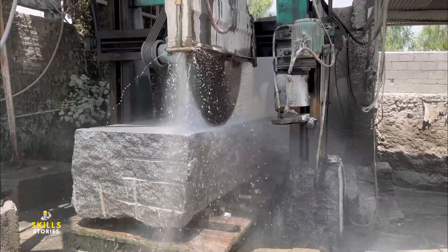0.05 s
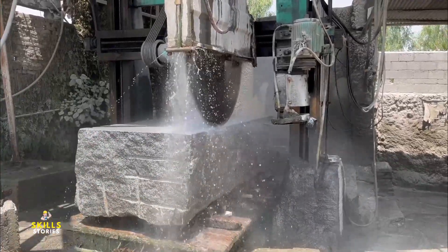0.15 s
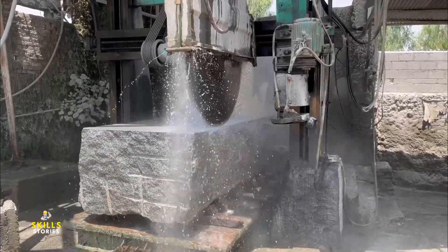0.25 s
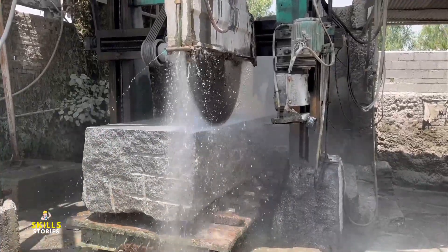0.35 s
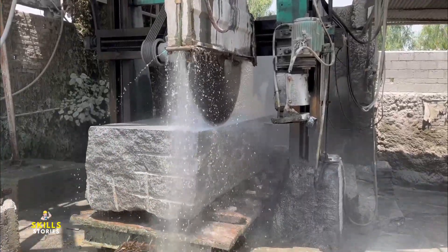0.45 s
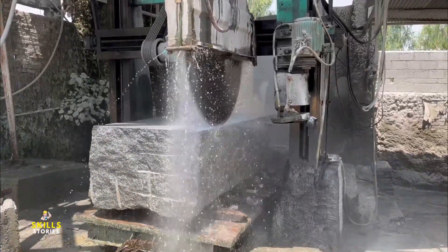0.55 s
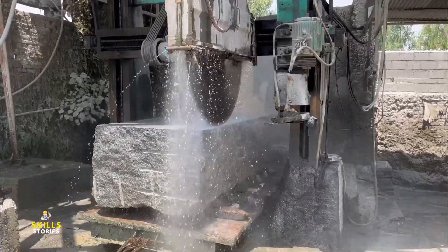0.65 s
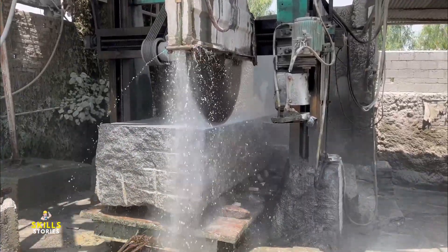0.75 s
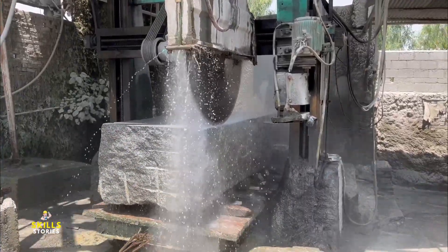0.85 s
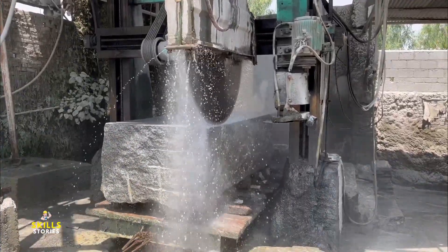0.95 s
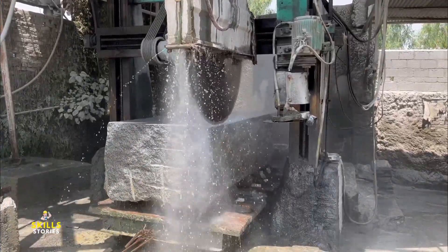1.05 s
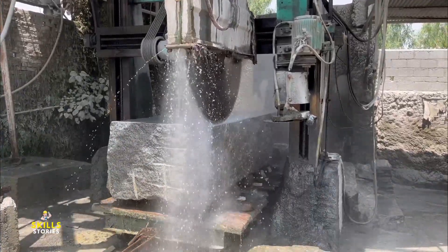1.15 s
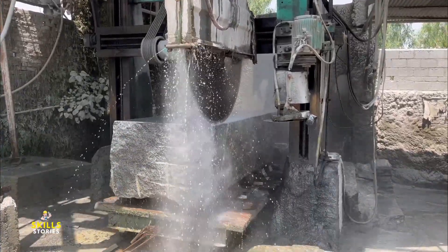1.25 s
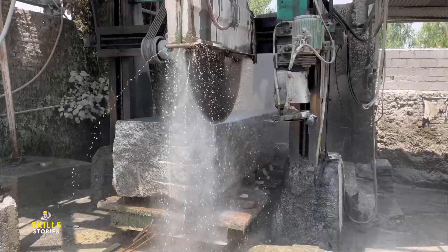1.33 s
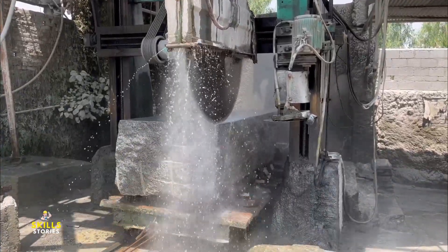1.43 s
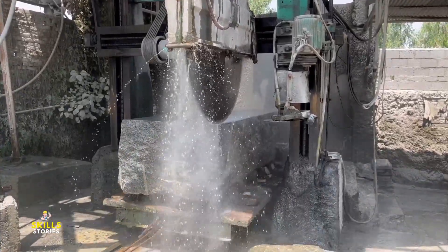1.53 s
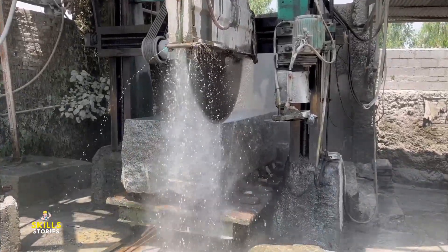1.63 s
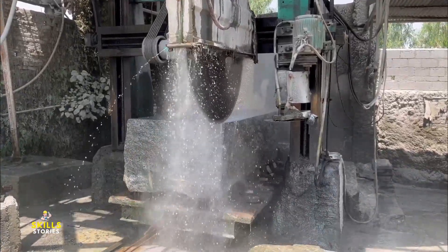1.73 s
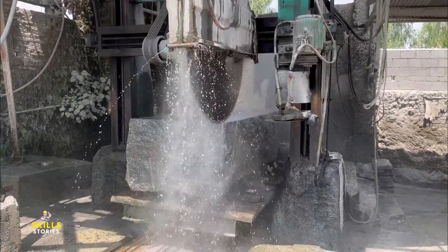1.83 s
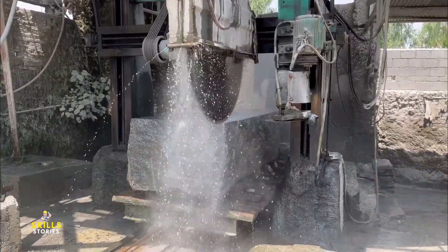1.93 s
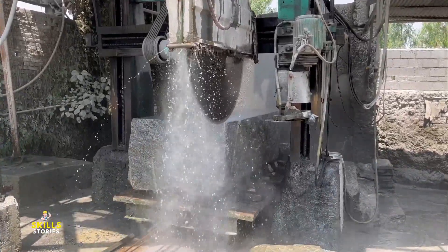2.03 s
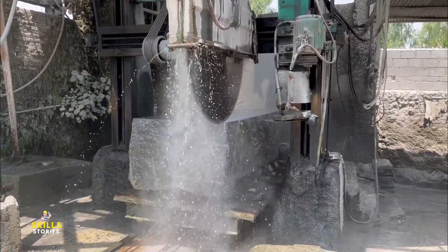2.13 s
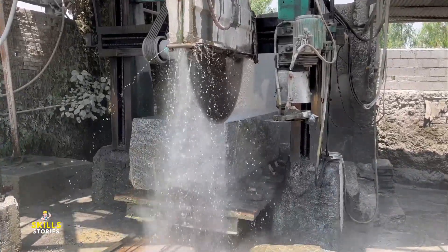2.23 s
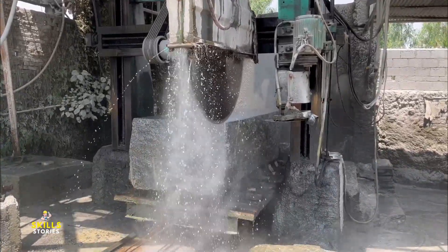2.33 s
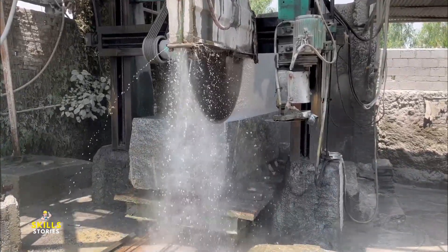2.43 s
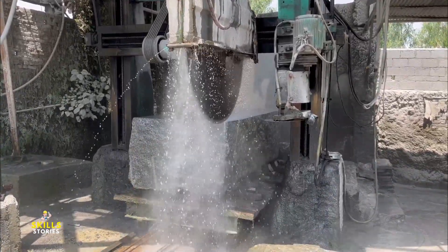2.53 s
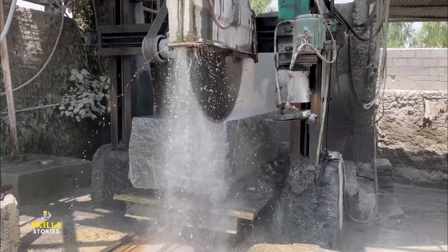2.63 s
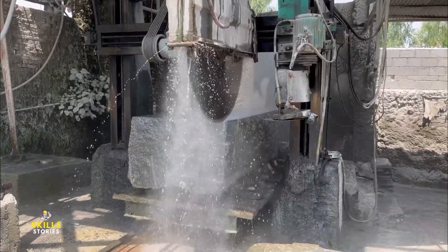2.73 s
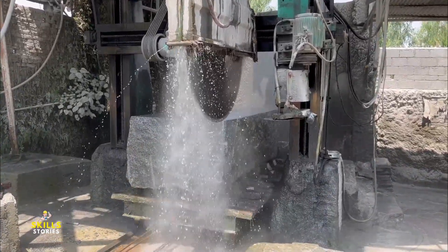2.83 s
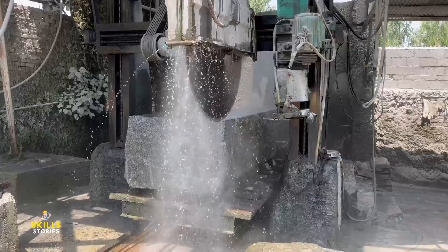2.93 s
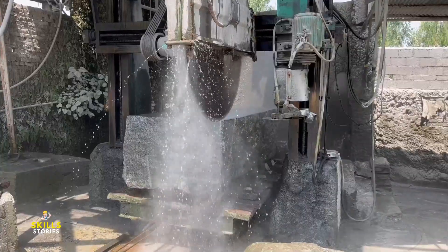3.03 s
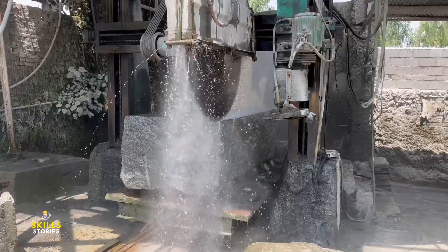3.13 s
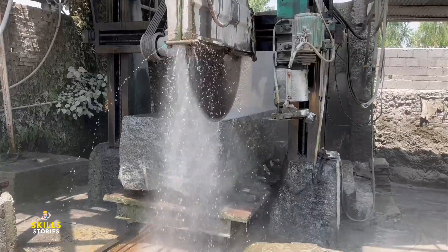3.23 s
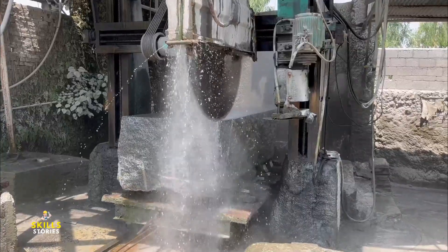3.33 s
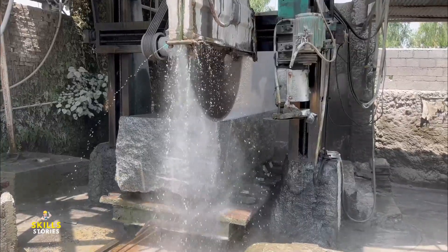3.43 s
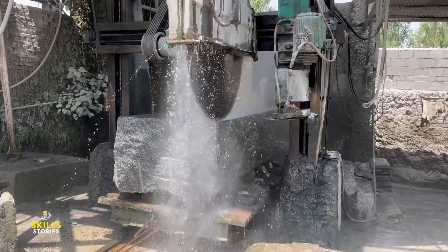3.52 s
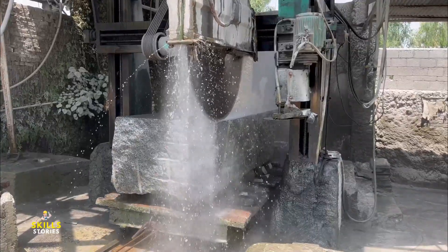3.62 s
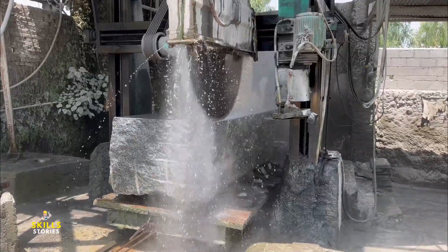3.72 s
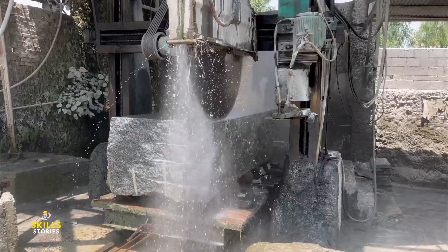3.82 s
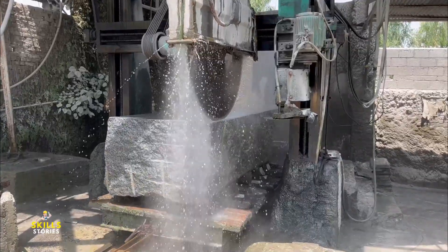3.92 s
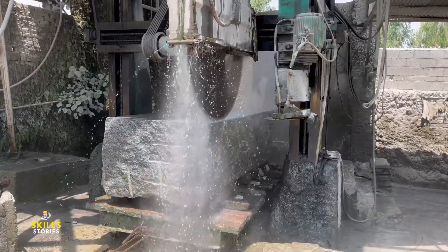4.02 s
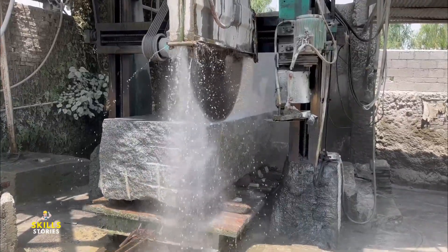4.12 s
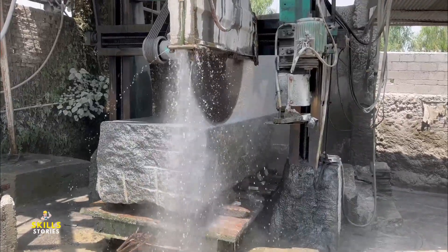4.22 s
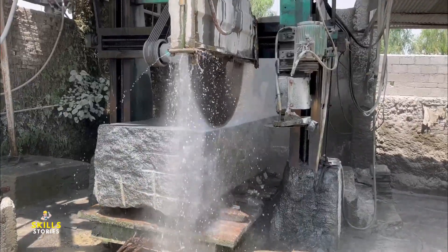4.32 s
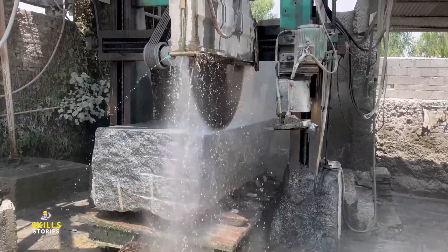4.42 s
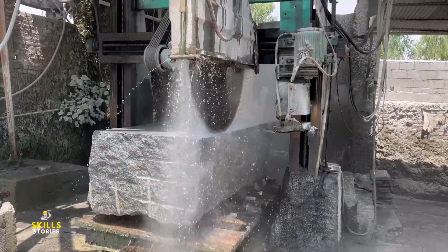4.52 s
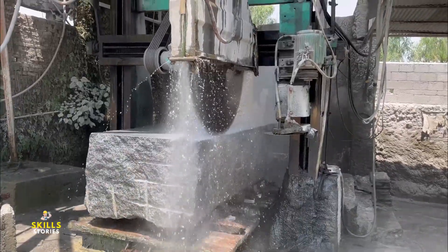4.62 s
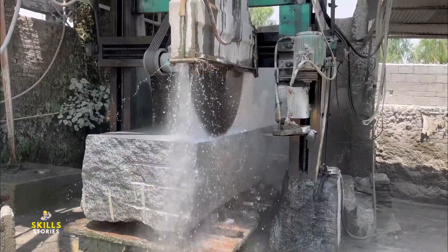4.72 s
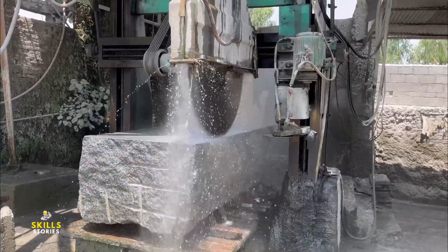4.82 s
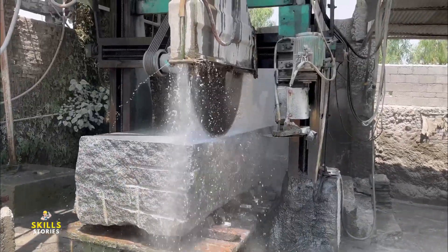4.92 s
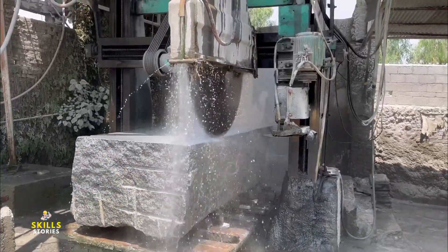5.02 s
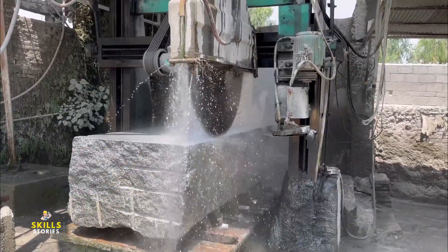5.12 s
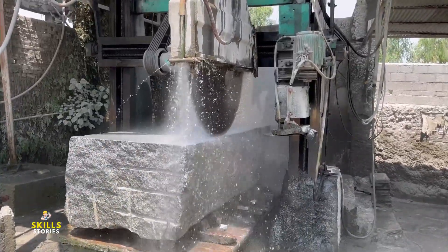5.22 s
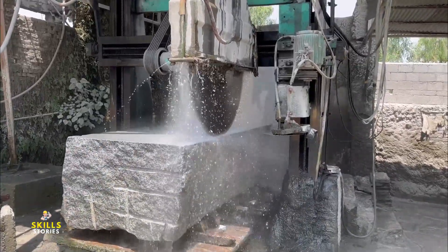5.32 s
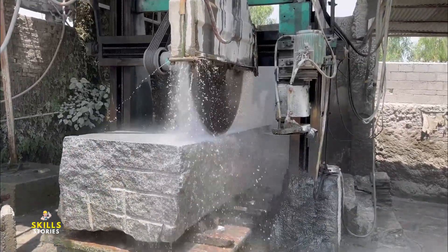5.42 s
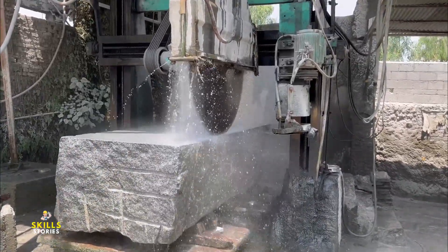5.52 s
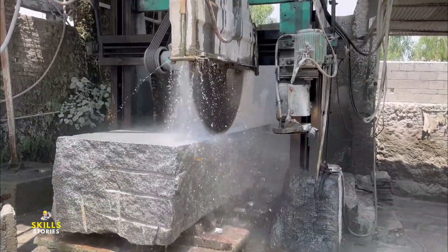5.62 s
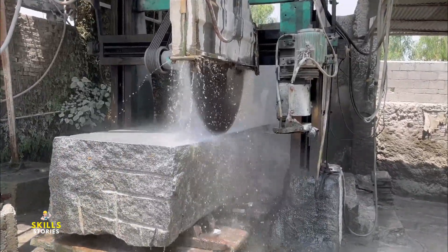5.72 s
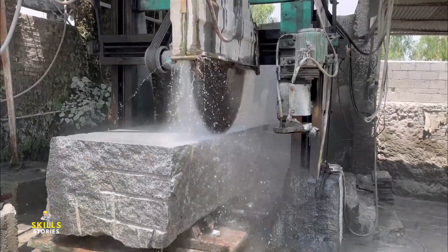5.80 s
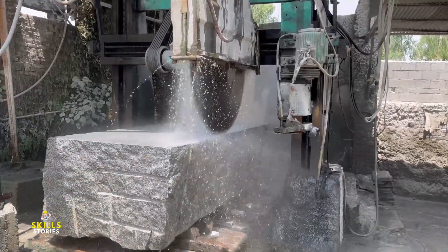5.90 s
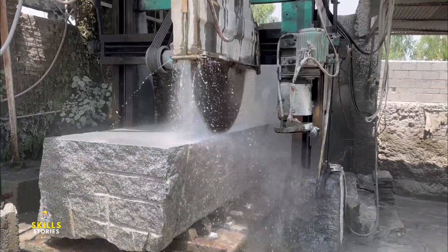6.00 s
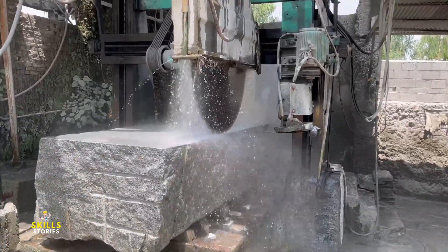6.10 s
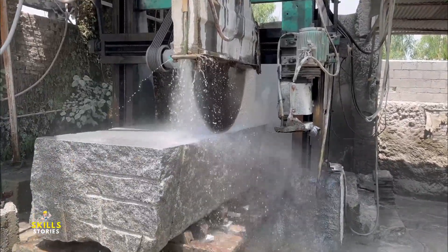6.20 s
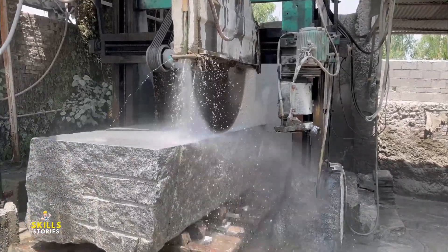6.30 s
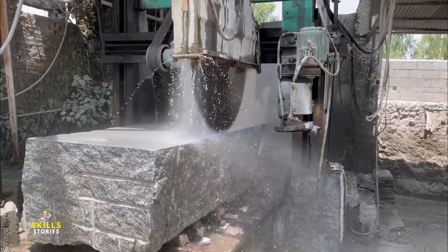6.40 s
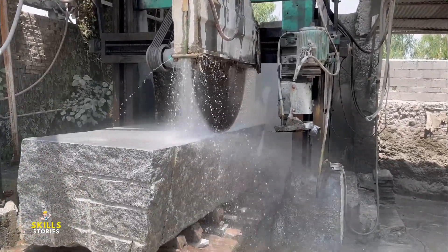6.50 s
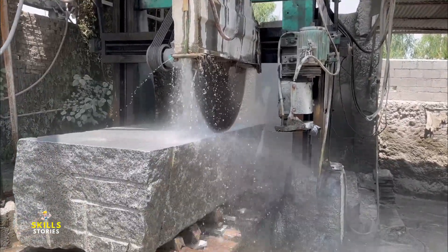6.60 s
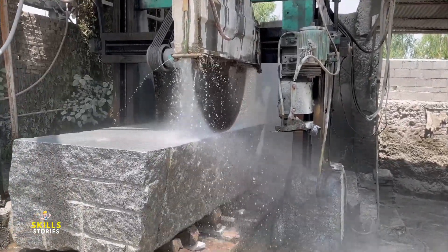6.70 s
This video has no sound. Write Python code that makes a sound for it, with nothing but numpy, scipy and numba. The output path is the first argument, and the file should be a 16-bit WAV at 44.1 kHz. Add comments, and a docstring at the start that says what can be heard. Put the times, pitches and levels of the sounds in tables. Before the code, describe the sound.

Bright gritty scraping and steely singing of a stone saw, a short gap of motor hum and hissing water, then renewed grinding.

```python
"""Under a workshop roof, a big water-cooled disc saw grinds a stone block, runs out of it, then bites again.
Diamond segments scrape the stone: noise that partly repeats every turn, coloured by the ringing steel disc.
Multiples of the turn rate sing as wavering sines, and the freed disc rings out as fading ones.
Motor and belts hum as sines, a low tone swells twice, and water hisses as shaped noise over the frame's rumble.
A phone hears it all through two ports, with short echoes on the scrape and the water."""
import sys
import numpy as np
from scipy import signal
from scipy.fft import rfft, irfft
from scipy.io import wavfile
from scipy.ndimage import uniform_filter1d
from numba import njit

SR = 44100
rng = np.random.default_rng(int(sys.argv[2]) if len(sys.argv) > 2 else 0)


def unload_wav(signal):
    """Save mono or channel-first audio to the path in sys.argv[1] as 16-bit WAV at rate SR, clipped to [-1, 1]."""
    wavfile.write(
        sys.argv[1],
        SR,
        np.round(np.clip(np.atleast_2d(signal).T, -1, 1) * 32767).astype(np.int16),
    )


N = 297675
T = np.arange(N) / SR  # time in s
HZ = np.arange(N // 2 + 1) * SR / N  # frequencies of the spectrum
SIDE = np.array([[.5], [-.5]])  # left gets half a difference, right the opposite half
TURN_HZ, SAG_HZ_PER_S = 25.805, .0037  # turn rate of the disc at the start, and its slow fall

# how the two ports of the phone differ:
# pitch_hz, left_minus_right_db, left_lead_rad
PORTS = [(100, 3, -.1), (500, -1, -.3), (900, -1.5, -.6), (1100, -3.5, .4), (1290, -5, 1.5),
         (1420, -7, 3.1), (1640, 0, 2.8), (1900, 6, 2.1), (2070, 6.5, 1.5), (2250, 3, .2), (2750, 1.5, -.9),
         (3800, -2, -.6), (4300, -2, .5), (5500, 4, .9), (6500, 5, 1.5), (8500, 5, 1.5), (9800, 7, 1),
         (11400, 12, 1), (12300, 7, 1.2), (13000, 1, 3), (14000, 0, 4.2), (15000, 0, 5.2), (15800, 1, 4.2)]
# passes of the disc through the block:
# meets_stone_s, leaves_stone_s, scrape_db (once the fresh edge has eased), repeating_share (0-1)
PASSES = [(-1.8, 1.767, -26.5, 0.22), (3, 9, -25, 0.15)]


def undb(db):
    """Turn a level in dB into a gain."""
    return 10 ** (np.asarray(db) / 20)


def unit(x):
    """Scale to an rms of 1."""
    return x / np.sqrt(np.mean(x ** 2))


def across(table, column):
    """Join the points of a table into a curve over frequency, on a log axis."""
    rows = np.array(table, float)
    return np.interp(np.log(HZ + 1), np.log(rows[:, 0]), rows[:, column])


def walk(rate):
    """Smooth random wandering with a spread near 1, heading for a new value `rate` times a second."""
    hold = int(SR / rate)
    steps = np.repeat(rng.standard_normal(N // hold + 1), hold)
    return 1.34 * uniform_filter1d(uniform_filter1d(steps, hold), hold)[:N]


def by_pass(first, second):
    """Give the first value until the rim meets the stone again, then the second."""
    return np.where(T < PASSES[1][0], first, second)


def tone(phase, db, pan_db, lead, waver_db):
    """A sine of wavering level, louder and earlier at one port."""
    wave = np.sin(phase + rng.uniform(0, 2 * np.pi) + SIDE * lead)
    level = undb(db + waver_db * walk(6))
    return np.sqrt(2) * level * wave * undb(SIDE * pan_db)


def heard(x, wide_hz):
    """Place a broad source at both ports, less alike above wide_hz, with echoes from roof and walls."""
    # row 0 is shared by the ports; rows 1 and 2 belong to one port each
    t60_s, alike_below_hz, wet_db = 0.11, 1180, -14
    tail = rng.standard_normal((3, N)) * 10 ** (-3 * T / t60_s)
    tail = rfft(tail / np.sqrt(np.sum(tail[0] ** 2)), axis=1)
    # echoes differ left and right except in the bass
    alike = np.exp(-(HZ / alike_below_hz) ** 2)
    echo = np.sqrt(alike) * tail[0] + np.sqrt(1 - alike) * tail[1:]

    parts = rfft(x, axis=1)
    shared = 1 / (1 + (HZ / wide_hz) ** 1.23)
    near = np.sqrt(shared) * parts[0] + np.sqrt(1 - shared) * parts[1:]
    port_gain = undb(SIDE * across(PORTS, column=1))
    port_timing = np.exp(1j * SIDE * across(PORTS, column=2))
    room = (1 + undb(wet_db) * echo) / np.hypot(1, undb(wet_db))
    return irfft(near * port_gain * port_timing * room, N)


def force_db():
    """Scraping level: grows as the rim sinks in, peaks on the fresh edge, eases, drops as the rim runs out."""
    enter_s, enter_power, leave_s, leave_power = 0.42, 1.4, 0.3, 0.6  # length and bend of each ramp
    bite_db, settle_s = 4.5, 1.0  # extra force on the fresh edge, and how fast it eases
    gain = 1e-4  # a floor that keeps the level finite
    for meets, leaves, db, _ in PASSES:
        sinking_in = np.clip((T - meets) / enter_s, 0, 1) ** enter_power
        running_out = np.clip((leaves - T) / leave_s, 0, 1) ** leave_power
        bite = bite_db * np.exp(-np.maximum(T - meets - enter_s, 0) / settle_s)
        gain = gain + sinking_in * running_out * undb(db + bite)
    return 20 * np.log10(gain)


def load(force):
    """How hard the machine works, 0-1: the scraping strength averaged over a short time."""
    full_load_db, average_s = -28, .1
    return uniform_filter1d(np.minimum(undb(force - full_load_db), 1), int(average_s * SR))


@njit
def recur(fresh, lag, keep):
    """Noise that returns after `lag` samples, slowly worn into a new pattern."""
    y = fresh.copy()
    for i in range(len(y)):
        p = i - lag[i]
        if p >= 0:
            j = int(np.round(p))
            y[i] = keep * y[j] + np.sqrt(1 - keep * keep) * fresh[i]
    return y


def patchy(x, flicker_db, rate, chatter_db):
    """Bands a third of an octave apart swell and sink by themselves, as grains and veins of stone pass."""
    parts = rfft(x, axis=1)
    place = np.clip(3 * np.log2((HZ + 1) / 1500), 0, 10)  # all below 1500 Hz moves as one band
    out = 0
    for k in range(11):
        band = irfft(parts * np.maximum(1 - abs(place - k), 0), N, axis=1)
        out = out + undb(flicker_db * walk(rate) + chatter_db * walk(28.05)) * band
    return out


def scrape(rate, turns, force):
    """Segments scraping stone: fresh grit plus a pattern that returns each turn, ringing the disc."""
    # colour of the scrape: pitch_hz, level_db (per Hz, relative)
    scrape_colour = [(60, -91), (140, -12.5), (400, -15.5), (580, -18), (660, -7), (900, -20),
                     (1010, -21.5), (1300, -13), (1700, -19), (2700, -9), (3900, -8), (4900, 0),
                     (7000, -0.5), (9500, -9), (13000, -12), (15800, -9.5)]
    # resonances of the disc, and dips between them, against the scrape's colour:
    # pitch_hz, first_pass_db, fresh_edge_db, late_second_pass_db
    disc_modes = [(826, 5, 11, 3), (860, 8, 12, 3), (1375, 5, 10, 1), (1480, 5, 10, 3), (2045, 4, 7, 4),
                  (2153, 8, 8, 11), (2239, 9, 3, 3), (2497, 9, 10, 7), (2605, 6, 3, 3), (2735, 5, 10, 1),
                  (2777, 9, 14, 8), (3230, 5, 5, 5), (3350, 6, 6, 6), (3725, 5, 9, 8), (4306, 8, 2, 3),
                  (4349, 4, 5, 5), (4651, 8, 7, 6), (4780, 8.5, 7, 3.5), (4870, 8, 7, 6), (4950, 6, 8, 0),
                  (5017, 6, 5, 5), (5124, 5, 9, 2), (5210, 9, 0, 2), (5383, 8, 4, 4), (5450, -10, -8, -5),
                  (5530, 4, 8, 5), (5610, 9, 9, 5), (5720, -10, -8, -4), (5878, 8, 7, 4), (6210, 4, 7, 8),
                  (6300, -12, -6, -6), (6373, 0, 5, 5), (6470, 4, 8, 0), (6570, -6, -10, -12),
                  (6632, 8, 9, 0), (6847, 7, 9, 5.5), (7175, 5, 6, 12), (7240, 7, 6, 8), (7364, 8, 7, 5),
                  (7530, 5, 4, 6), (7687, 12, 7, 12), (7880, 6, 8, 5), (7988, 4, 10, 2), (8118, 9, 4, 5.5),
                  (8311, 5, 6, 7), (8460, -10, -8, -6), (8591, 10, 11, 10), (8871, 9, 6, 6),
                  (9173, 9, 5, 9), (9625, 7, 10, 8), (9790, -12, -10, -8), (9880, -15, -15, -12),
                  (10012, 7, 3, 7), (10508, 7, 4, 8), (10745, 5, 6, 5), (11089, 6, 3, 5), (11735, 5, 7, 7),
                  (12037, 6, 6, 5), (12338, 6, 6, 5)]
    disc_width_hz, ring_waver_db = 45, 1.2
    edge_worn_s, edge_blend_s = 4.1, .3  # when the fresh edge's colour gives way, and over how long
    # light contact chatters band by band and keeps only a share of the broad hiss
    ragged_db, ragged_below_db, light_hiss = 2.5, -28, .7

    share = by_pass(PASSES[0][3], PASSES[1][3])
    once = recur(rng.standard_normal(N), SR / rate, 0.894)
    twice = recur(rng.standard_normal(N), 2 * SR / rate, 0.94)  # returns every second turn
    # the turn's pattern is lost in the top treble
    pattern = irfft(rfft(once + 0.53 * twice) / np.hypot(1, (HZ / 8000) ** 3), N)
    grit = np.sqrt(share) * unit(pattern) + np.sqrt(1 - share) * rng.standard_normal((3, N))
    # a disc slightly out of round presses harder once a turn
    press = 1 + 0.074 * np.cos(2 * np.pi * turns)
    grit = rfft(grit * press * undb(0.5 * walk(11)), axis=1)
    grit = grit * undb(across(scrape_colour, column=1))

    light = np.clip((ragged_below_db - force) / 5, 0, 1)
    out = irfft(grit, N, axis=1) * (1 - (1 - light_hiss) * light)
    modes = np.array(disc_modes, float)
    shape = 1 / (1 + (2 * (HZ - modes[:, :1]) / disc_width_hz) ** 2) ** 1.5
    worn = np.clip(.5 + (T - edge_worn_s) / edge_blend_s, 0, 1)
    # two interleaved sets of resonances, each fluttering on its own walk
    for k in range(2):
        extra_power = (undb(modes[k::2, 1:].T) ** 2 - 1) @ shape[k::2]
        rings = np.sqrt(np.maximum(1 + extra_power, .05)) - 1
        first, edge, late = (irfft(grit * ring, N, axis=1) for ring in rings)
        ringing = by_pass(first, edge + worn * (late - edge))
        out = out + undb(ring_waver_db * walk(14)) * ringing
    out = patchy(out, flicker_db=1.13, rate=13, chatter_db=ragged_db * light)
    return heard(unit(out) * undb(force), wide_hz=5700)


def singing(turns, force):
    """The once-a-turn push sounds its multiples in the stone; the steel rings on briefly after."""
    # tones on multiples of the turn rate, levels before the grip moves them:
    # turn_multiple, first_pass_db (rms), second_pass_db (rms)
    turn_tones = [(6, -53, -57), (8, -55, -58), (15, -58, -58), (16, -48, -47), (17, -48, -56),
                  (20, -51, -55), (24, -57, -58), (29, -57, -55), (32, -55, -51), (33, -55, -62),
                  (34, -59, -49), (35, -59, -54), (36, -54, -52), (37, -67, -50), (49, -57, -58),
                  (53, -54, -57), (54, -52, -58), (52, -57, -60), (55, -58, -59), (87, -47, -59),
                  (101, -52, -61), (107, -44.5, -53), (108, -58, -44), (110, -54, -54), (116, -56, -51),
                  (125, -55, -52), (155, -62, -54), (169, -50, -52), (178, -71, -45), (189, -48, -51),
                  (195, -46, -47), (208, -45, -51), (210, -47, -51), (218, -43, -53), (230, -48, -65)]
    # tones follow the force at this slope about the grip level, up to a ceiling, and drop out well below it
    grip_db, grip_slope, grip_top_db, grip_lost_db = -26.5, 0.38, 4, 5
    ring_on_s = 0.046
    # standing waves under the roof place each tone a little differently, less so in the bass
    scatter_db, scatter_rad = 3, 0.5

    over = force - grip_db
    push = undb(np.minimum(grip_slope * over, grip_top_db) + np.minimum(over + grip_lost_db, 0))
    keep = np.exp(-1 / (ring_on_s * SR))
    grip = 20 * np.log10(signal.lfilter([1 - keep], [1, -keep], push, zi=[push[0]])[0])
    port_db, port_lead = across(PORTS, column=1), across(PORTS, column=2)
    out = 0
    for k, first_db, second_db in turn_tones:
        bin_at = int(k * TURN_HZ * N / SR)
        scatter = min(k / 40, 1)
        pan_db = port_db[bin_at] + scatter * scatter_db * rng.standard_normal()
        lead = port_lead[bin_at] + scatter * scatter_rad * rng.standard_normal()
        # high multiples are rougher: the grit shakes their timing and strength more
        phase = 2 * np.pi * k * turns + 0.0041 * k * walk(16)
        out = out + tone(phase, by_pass(first_db, second_db) + grip, pan_db, lead, waver_db=1.5 + k / 120)
    return out


def drive(work):
    """Motor and belt sines that slow under load; the left port lags more at higher pitch."""
    # motor and belt tones, before slowing and swelling: free_pitch_hz, level_db (rms), left_minus_right_db
    drive_tones = [(157.56, -57.5, 3), (236.3, -58, 2), (262.1, -60, 1), (289.2, -52, 2), (315.1, -40, 2),
                   (340.9, -61, 1), (365.6, -60, 1), (393.9, -47.5, -1), (472.7, -60, 1), (548.4, -53, -1),
                   (551.45, -56, -1), (715.6, -60, 0), (787.8, -48, -1), (866.2, -56, -2), (1102, -56, -2),
                   (1181.2, -60, -6)]
    # the hum swells as a whole: time_s, change_db
    hum_swell = [(0, 1.5), (1.3, -1), (2.2, 0), (3.0, 2), (3.8, 2), (4.3, 0), (6.75, -2.5)]
    # share of its speed the motor loses at full load: first_pass, second_pass
    motor_slip = (.0009, .0016)
    clock = np.cumsum(1 - by_pass(*motor_slip) * work) / SR
    hum = sum(tone(2 * np.pi * hz * clock, db, pan_db, -hz / 1700, waver_db=.4)
              for hz, db, pan_db in drive_tones)
    return hum * undb(np.interp(T, *np.transpose(hum_swell)))


def low_tone():
    """A steady low sine that swells twice and dies away."""
    # swells of the low tone: start_s, level_db (rms)
    low_swells = [(-.05, -44.5), (.55, -51)]
    pitch_hz, rise_s, hold_s, fall_db_per_s = 138, 0.076, 0.3, 90
    swell = 0
    for start, db in low_swells:
        rise = np.clip((T - start) / rise_s, 0, 1)
        fall_db = fall_db_per_s * np.maximum(T - start - hold_s, 0)  # hold_s counts from the start
        swell = swell + rise * undb(db - fall_db)
    return swell * tone(2 * np.pi * pitch_hz * T, 0, 3.2, 0, waver_db=0.0)


def spray(work):
    """Smooth hiss of countless drops over the frame's rumble, both swelling a little with flow and load."""
    # colour of the water thrown off the disc and the rumble of the frame: pitch_hz, level_db (per Hz, relative)
    spray_colour = [(40, -40), (62, -35), (85, -26), (180, -12.5), (300, -11), (430, -10.5), (600, -12),
                    (850, -7.5), (1000, -14.5), (1550, -12.5), (2200, -11.5), (2750, -0.5), (3300, 1.5),
                    (3750, -2), (4200, -10.5), (6000, -15.5), (9000, -21.5), (13000, -27.5), (15800, -28)]
    spray_db, spray_load_db = -33.5, 0.52  # level without load, and the hiss's gain at full load
    rumble_load_db, rumble_below_hz = 1.5, 660
    parts = rfft(rng.standard_normal((3, N)), axis=1) * undb(across(spray_colour, column=1))
    whole = irfft(parts, N, axis=1)
    rumble = irfft(parts / (1 + (HZ / rumble_below_hz) ** 4), N, axis=1)
    hiss = whole - rumble
    both = hiss * undb(spray_load_db * work) + rumble * undb(rumble_load_db * work)
    flow = undb(spray_db + 0.82 * walk(1.58))
    return heard(both / np.std(whole) * flow, wide_hz=2830)


def ring_out():
    """Resonances of the freed disc swell as the rim runs out, then die away."""
    # free ringing of the disc: pitch_hz, level_db (rms at the top of the swell), t60_s (time to fall 60 dB)
    free_modes = [(540, -50, 3.5), (2244, -46, 2.5), (2572, -46, 1.5), (4745, -49, .8), (5877, -47.5, .7)]
    start_s, rise_s = 1.4, 0.36
    since = np.maximum(T - start_s, 0)
    rise = np.minimum(since / rise_s, 1)
    fading = np.maximum(since - rise_s, 0)
    return sum(rise * tone(2 * np.pi * hz * T, db - 60 * fading / t60, 0, 0, waver_db=1.0)
               for hz, db, t60 in free_modes)


def scene():
    """Disc, drive and water together, while the turn rate sags slowly."""
    rate = TURN_HZ - SAG_HZ_PER_S * T
    turns = np.cumsum(rate) / SR
    force = force_db()
    work = load(force)
    cutting = scrape(rate, turns, force) + singing(turns, force)
    machine = drive(work) + low_tone()
    return cutting + machine + spray(work) + ring_out()


def record(dry):
    """The phone cuts the top treble steeply, above 15750 Hz."""
    return signal.sosfilt(signal.ellip(16, .3, 70, 15750, fs=SR, output="sos"), dry)


dry = scene()
out = record(dry)
unload_wav(out)
```